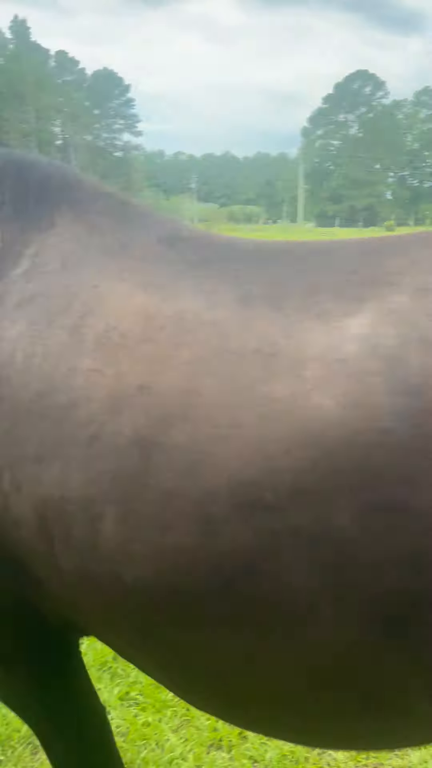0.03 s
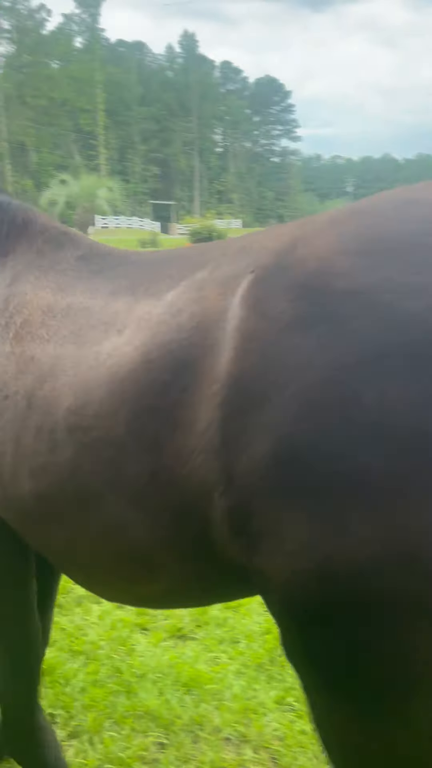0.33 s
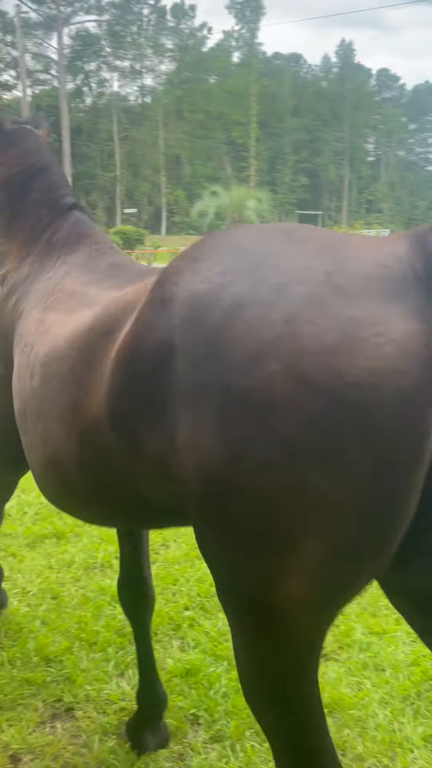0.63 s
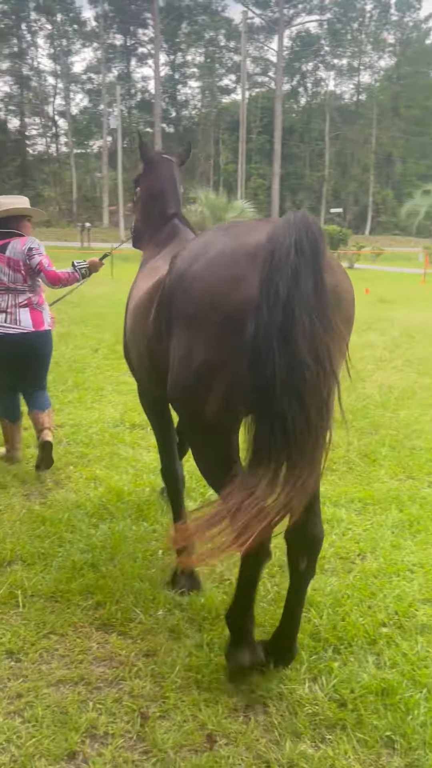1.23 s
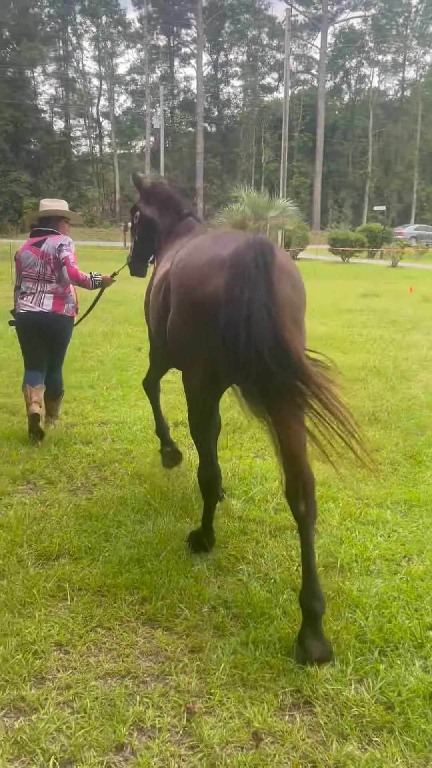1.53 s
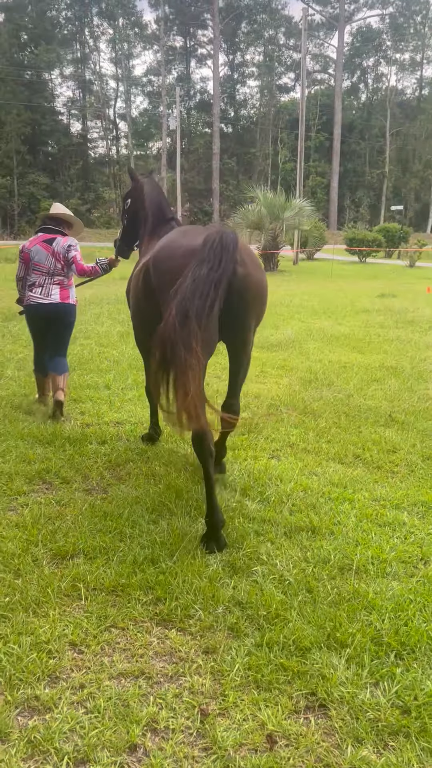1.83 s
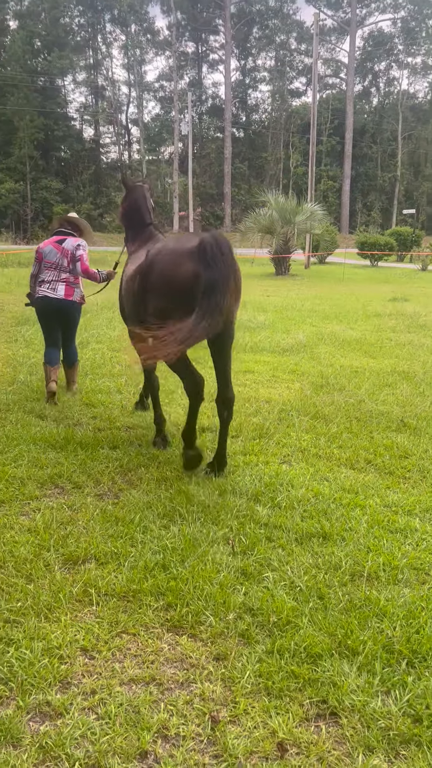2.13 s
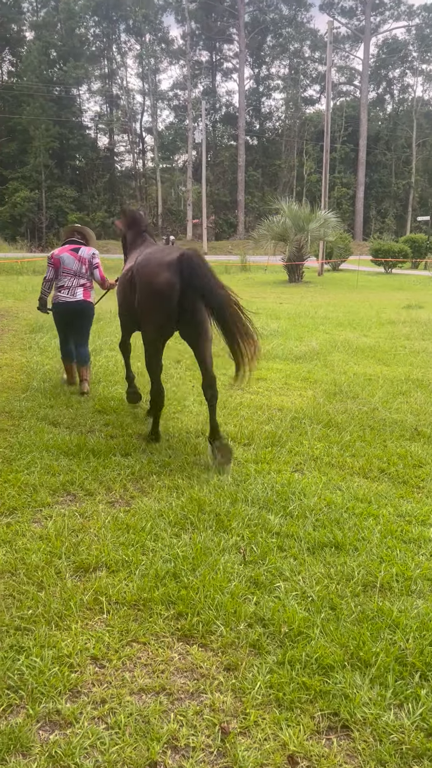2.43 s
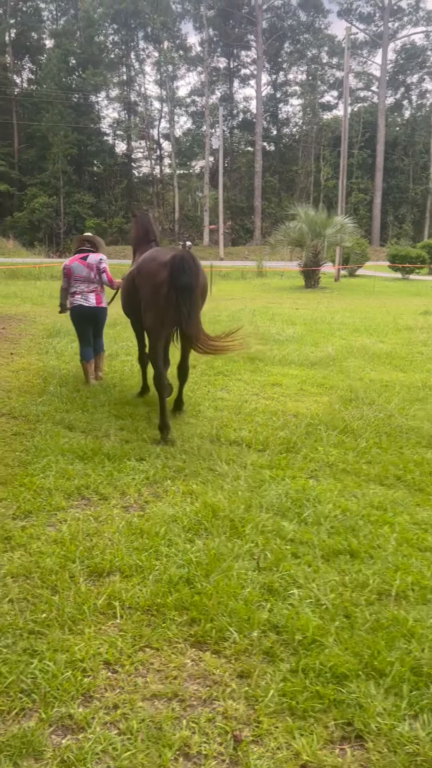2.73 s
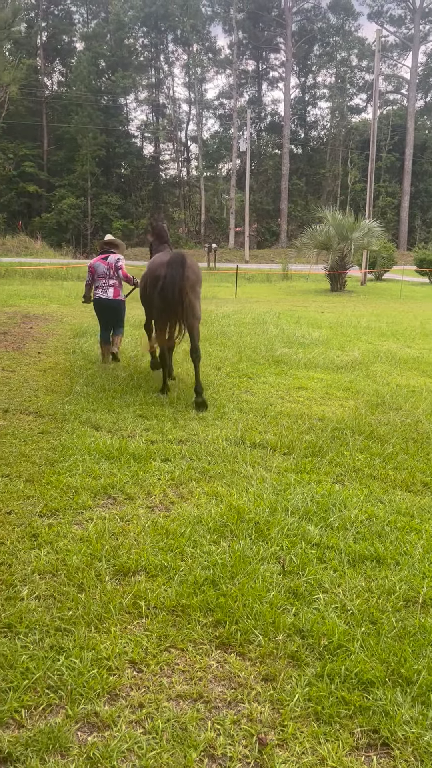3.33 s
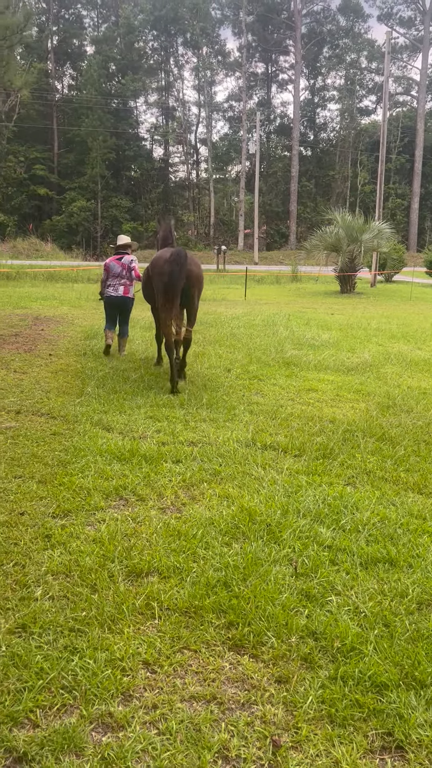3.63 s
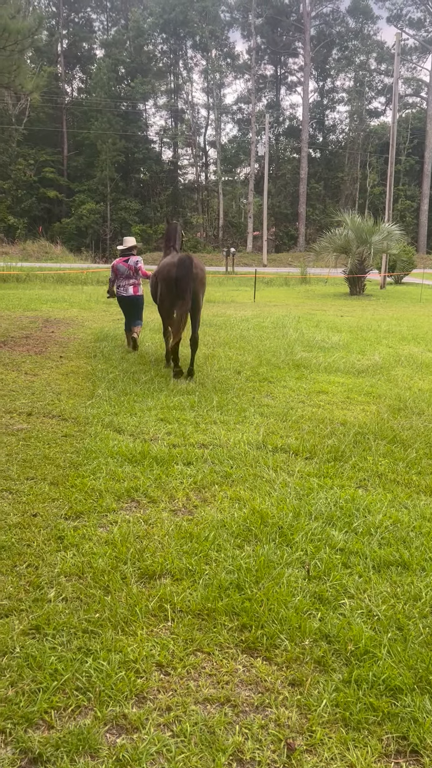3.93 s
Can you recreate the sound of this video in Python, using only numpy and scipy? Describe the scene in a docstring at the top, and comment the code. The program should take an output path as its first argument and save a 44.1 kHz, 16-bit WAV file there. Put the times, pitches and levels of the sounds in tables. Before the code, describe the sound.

A horse and its handler walk away through grass, with soft swishes and dull low thuds, strongest in the first two seconds. Dry stalks snap near 0.1, 0.3 and 0.6 seconds. A distant car rumbles throughout, its tyre hiss swelling around 1.6 seconds, then fading. At about 2.7 seconds a hoof clips something hard with a dry clack. The steps grow faint while far insects shrill steadily on the left.

```python
"""A car rumbles by on the road beyond the field and fades; far insects shrill steadily to the left.
Nearer the stereo pair, a horse and its handler walk away over a lawn: legs swish through the grass,
hooves, steps and wind buffets give dull low thuds, a few dry stalks snap, and sod and thatch
crunch underfoot. Late in the walk a hoof clips something hard."""
import sys
import numpy as np
from scipy import signal
from scipy.fft import rfft, irfft, next_fast_len
from scipy.io import wavfile
from scipy.ndimage import uniform_filter1d, map_coordinates

SR = 44100
rng = np.random.default_rng(int(sys.argv[2]) if len(sys.argv) > 2 else 0)


def waveform_to_disk(signal):
    """Save audio, clipped to [-1, 1], as 16-bit WAV at the path in sys.argv[1]."""
    frames = np.transpose(np.atleast_2d(signal))
    scaled = np.clip(frames, -1, 1) * 32767
    samples = np.round(scaled).astype(np.int16)
    wavfile.write(sys.argv[1], SR, samples)


N = 176400

# the car beyond the field, part by part [t/s, level/dB]
RUMBLE_LEVEL = [(0, -40.5), (.5, -40.5), (1.3, -40.5), (2, -42), (3, -45), (4, -45.5)]
DRONE_LEVEL = [(0, -60), (.35, -44), (1.3, -49.5), (2.2, -57), (3, -60), (4, -82)]
TYRE_LEVEL = [(0, -44.5), (.5, -44), (1.2, -47), (1.75, -47), (2.4, -49.5), (3.2, -50), (4, -51.5)]
HISS_LEVEL = [(0, -60), (1.4, -68), (1.6, -51), (2.1, -52.5), (2.6, -53), (3.2, -55.5), (4, -57)]  # brighter tyre hiss swells as the car goes by
# narrow bands of tyre noise that sink as it passes [t/s, f/Hz, level/dB]
TYRE_WHOOSH = [(0, 1170, -49), (.35, 1017, -50), (.8, 900, -55.5), (1.3, 776.7, -51.5), (1.7, 732.3, -61),
               (4, 729, -67)]
TYRE_WHINE = [(0, 740.6, -77), (1.3, 739, -54), (2, 721, -62), (3, 718, -62.5), (4, 725, -65.5)]
# spectra of the distant sounds [f/Hz, relative level/dB]
RUMBLE_SPECTRUM = [(20, -67), (36, -15.5), (50, -0.5), (75, 2), (110, 1), (160, -4), (220, -11.5),
                   (300, -25.5), (500, -51), (1000, -71)]
DRONE_SPECTRUM = [(80, -19), (150, -2), (220, 3.5), (300, -7.5), (450, -17.5), (800, -37)]
TYRE_SPECTRUM = [(100, -10), (300, -13), (480, -8.5), (650, -7), (730, -0.5), (1150, 1), (1600, -1.5),
                 (2100, -4.5), (2500, -3.5), (2900, -8), (4000, -14), (6000, -18.5), (9000, -52),
                 (16000, -66)]
HISS_SPECTRUM = [(900, -35), (1400, 1), (1650, 3), (2100, 2), (2400, -8), (2900, -19), (4000, -38)]
INSECT_SPECTRUM = [(4000, -63), (6300, -27.5), (6850, -7.5), (7100, -4.5), (7400, -10), (7700, -11.5),
                   (8300, -17), (10000, -44), (16000, -68)]
# how they meet the microphones [f/Hz, coherence, left lead/rad, left over right/dB]
LOW_IMAGE = [(58.6, 0.99, 0, -1), (133, 1, 0, 1), (229, .97, 0, -3.5), (403, 0.68, 0.23, -0.5)]
ROAD_IMAGE = [(288, 0.76, .1, -6), (533, 0.99, 0.77, 4.5), (720, 0.81, 0.17, -0.5), (1110, 0.67, 0.82, 2.5),
              (1430, 0.43, 0.59, -0.5), (2160, 0.74, 1.88, -2), (3080, 0.92, 3.75, 2),
              (3950, 0.08, 3.73, 4.5), (6000, 0.52, 6.7, 3)]
HISS_IMAGE = [(1370, 0.85, 1, 2), (1730, 1, 1, -3), (2310, 1, 0.5, -9), (2790, 0.56, 4.5, -4)]
INSECT_IMAGE = [(6770, .1, 0.69, 11), (6800, 0.11, 1.5, 8.5), (8200, 0.25, 0.79, 1.4)]

SWISHES = [(.2, -44.5, 0.046, 0.04), (.29, -44, 0.058, 0.061), (0.449, -37.5, 0.046, 0.012),
           (.54, -51, 0.014, 0.11), (.63, -46.5, 0.096, 0.052), (.75, -43.5, .03, 0.054),
           (.83, -58, 0.035, 0.02), (.985, -47.5, 0.12, 0.014), (1.12, -51.5, 0.19, 0.076),
           (1.21, -45, 0.051, 0.033), (1.29, -48, 0.043, .06), (1.485, -46.5, 0.074, 0.02),
           (1.62, -50.5, 0.17, .05), (1.74, -43, 0.058, 0.035), (1.8, -48, 0.022, 0.065),
           (1.95, -52.5, 0.038, 0.043), (2.115, -47, 0.039, 0.085), (2.33, -50.5, 0.052, 0.087),
           (2.556, -43, 0.047, 0.037), (2.76, -51, 0.049, 0.044), (2.95, -50.5, 0.042, 0.077),
           (3.43, -55.5, 0.045, .06), (3.56, -57.5, 0.15, 0.033), (3.74, -56.5, 0.085, 0.02),
           (3.96, -52, 0.034, .03)]  # legs through grass [peak t/s, level/dB, rise/s, fall/s]
# dull low thuds of hooves, the handler's steps and wind buffets [t/s, relative level/dB, mid-glide f/Hz]
LOW_THUDS = [(0.092, -28.5, 68), (0.284, -26, 71), (.438, -32, 160), (.446, -28, 74), (0.492, -24.5, 65),
             (.652, -27, 61.4), (0.736, -28.5, 60), (.982, -25.5, 79.8), (1.007, -29.5, 83),
             (1.111, -33.5, 73.6), (1.36, -31.5, 112), (1.494, -23.5, 82), (1.723, -41, 99),
             (1.935, -29.5, 149.4), (1.943, -38.5, 239), (1.954, -26, 76.5), (2.805, -32.5, 66.4),
             (3.118, -35, 75), (3.169, -35, 79)]
STALK_SNAPS = [(.0961, -13.5, 5940, 16700, 0.00063, 0.0079), (.1745, -37, 8000, 15000, .0003, .012),
               (0.197, -36, 6500, 15000, .0002, .007), (0.208, -35, 6000, 14000, .0002, .006),
               (0.215, -41.5, 2200, 6000, .0003, 0.017), (0.236, -38, 2170, 3740, .0003, 0.02),
               (0.267, -35, 9000, 16000, .0002, .006), (0.2767, -25.5, 1890, 9800, 0.00057, 0.015),
               (0.3392, -31, 4500, 14000, 0.00028, 0.0065), (.4635, -30.5, 5000, 13000, .0002, 0.0066),
               (.5422, -43, 8000, 16000, .0002, .008), (0.6464, -16.5, 5150, 17100, 0.002, 0.014),
               (1.2087, -32, 5000, 15000, .0002, 0.0079), (2.1075, -39, 5970, 15000, .0002, .007),
               (2.584, -34, 9000, 17000, .0002, .0067)]  # dry stalks [t/s, level/dB, low f/Hz, high f/Hz, rise/s, t60/s]
STALK_MODES = [(5300, -15), (6550, -22), (9250, -16)]  # a hollow stalk's ring [f/Hz, relative level/dB]
SOD_SCUFFS = [(.44, -52), (0.814, -50.5), (1.214, -51), (1.37, -55), (1.94, -59), (2.549, -47.5),
              (2.754, -53), (2.925, -54), (3.08, -62), (3.25, -58), (3.402, -54), (3.975, -56)]  # feet on sod [t/s, relative level/dB]
THATCH_CRUNCHES = [(0.447, -53, 0.018), (0.987, -43, 0.0091), (1.483, -49.5, 0.016), (2.553, -56, 0.011)]  # feet on dry thatch [peak t/s, level/dB, Gaussian width/s]
KNOCK_MODES = [(199.2, -12, 0.029), (780, -14, 0.033), (1140, -3, 0.012), (1850, 0, 0.0073),
               (2130, 0, 0.0085), (2630, -15.5, .01)]  # the hard thing a hoof clips [f/Hz, relative level/dB, t60/s]
# spectra of the near sounds [f/Hz, relative level/dB]
GRASS_SPECTRUM = [(150, -19), (400, 3.5), (1500, -3.5), (3000, -1), (5500, -4.5), (8000, 0.5), (10000, 2.5),
                  (12000, 4.5), (14000, -0.5), (15600, -4)]
PUFF_SPECTRUM = [(40, -18), (150, 5.5), (300, -6.5), (600, -20), (2000, -45), (8000, -80)]
SOD_SPECTRUM = [(100, -23), (280, 10), (500, 1), (800, -9.5), (1500, -4), (3000, -6), (8000, -53)]
THATCH_SPECTRUM = [(600, -8), (1500, -2), (2300, 8), (3500, -13), (6000, -12), (12000, -9)]
LAWN_COHERENCE = [(300, .85), (2000, .5), (5000, .4), (8000, .75), (10000, .96), (15000, .96)]  # how alike the microphones hear the lawn [f/Hz, coherence]
TOP_LIFT = [(13500, 0), (14600, 3), (15700, 5)]  # a gentle brightening of the highest treble [f/Hz, gain/dB]


def amp(db):
    return 10 ** (np.asarray(db) / 20)


def unit(x):
    return x / np.sqrt(np.mean(x ** 2) + 1e-20)


def along(points, hz):
    """Each column after the frequency, read on a log axis."""
    f, *cols = np.transpose(points)
    return [np.interp(np.log(hz + 1), np.log(f + 1), c) for c in cols]


def curves(rows):
    """One value per sample for each column after the time."""
    s, *cols = np.transpose(rows)
    return [np.interp(np.arange(N) / SR, s, c) for c in cols]


def wobble(per_s):
    """A smooth random curve with per_s knots a second."""
    knots = rng.standard_normal(int(N * per_s / SR) + 4)
    return map_coordinates(knots, [np.arange(N) * per_s / SR])


def impulses(per_s):
    """Two channels of randomly timed unit clicks."""
    return rng.random((2, N)) < per_s / SR


def filtered(x, response):
    """x through a frequency response."""
    m = next_fast_len(N + SR // 4)
    return irfft(rfft(x, m) * response(np.fft.rfftfreq(m, 1 / SR)), m)[..., :N]


def add(track, s, sound):
    """Mix a sound in at time s."""
    part = track[..., max(round(s * SR), 0):][..., :sound.shape[-1]]
    part += sound[..., :part.shape[-1]]


def coloured(x, spectrum):
    """x shaped by the spectrum, at rms 1."""
    return unit(filtered(x, lambda hz: amp(along(spectrum, hz)[0])))


def placed(pair, image):
    """Mid and side become left and right; image(hz) gives coherence, phase lead and balance."""
    m = next_fast_len(N + SR // 4)
    coherence, lead, balance_db = image(np.fft.rfftfreq(m, 1 / SR))
    turn = np.arccos(np.clip(coherence, 0, 1)) / 2
    mid, side = rfft(pair, m) * [np.cos(turn), np.sin(turn)]
    tilt = amp(balance_db / 2) * np.exp(.5j * lead)
    norm = np.sqrt((amp(balance_db) + amp(-balance_db)) / 2)
    return irfft(np.array([(mid + side) * tilt, (mid - side) / tilt]) / norm, m)[:, :N]


def rush(spectrum, image, patchy_db):
    """Stereo noise with patches of random gain across time and frequency."""
    cells = signal.stft(rng.standard_normal((2, N)), nperseg=512)[2]
    patches = uniform_filter1d(rng.standard_normal(cells.shape[1:]), size=4, axis=0)
    patches = uniform_filter1d(patches, size=12, axis=1)
    pair = signal.istft(cells * amp(patchy_db * unit(patches)), nperseg=512)[1][:, :N]
    return placed(coloured(pair, spectrum), lambda hz: along(image, hz))


def gliding_band(rows, half_width_hz):
    """Two channels of narrow noise following [t/s, f/Hz, level/dB] rows."""
    centre_hz, db = curves(rows)
    i, q = filtered(rng.standard_normal((2, 2, N)), lambda hz: 1 / (1 + (hz / half_width_hz) ** 2))
    phase = 2 * np.pi * np.cumsum(centre_hz) / SR
    return amp(db) * unit(i * np.cos(phase) + q * np.sin(phase))


def from_lawn(hz, lag_s=.000278, in_phase_hz=12050):
    """Treble from the lawn reaches the left microphone a little late."""
    lead = -2 * np.pi * lag_s * (hz - in_phase_hz) * (hz > 7000)
    return along(LAWN_COHERENCE, hz)[0], lead, np.zeros_like(hz)


def passing_car():
    """Beyond the field, rumble, drone and tyre noise fade as the car draws away."""
    rumble = amp(curves(RUMBLE_LEVEL)[0]) * rush(RUMBLE_SPECTRUM, LOW_IMAGE, patchy_db=-1.38)
    drone = amp(curves(DRONE_LEVEL)[0]) * rush(DRONE_SPECTRUM, LOW_IMAGE, patchy_db=-0.05)
    tyre_db = curves(TYRE_LEVEL)[0] + 0.98 * wobble(per_s=24.83)
    tyres = amp(tyre_db) * rush(TYRE_SPECTRUM, ROAD_IMAGE, patchy_db=1.38)
    hiss = amp(curves(HISS_LEVEL)[0]) * rush(HISS_SPECTRUM, HISS_IMAGE, patchy_db=1.5)
    whoosh = gliding_band(TYRE_WHOOSH, half_width_hz=167)
    whine = gliding_band(TYRE_WHINE, half_width_hz=23)
    return rumble + drone + tyres + hiss + placed(whoosh + whine, lambda hz: along(ROAD_IMAGE, hz))


def insects(level_db=-53, fade_db_per_s=0.1):
    """Far off to the left, a chorus merges into one narrow, trembling band."""
    db = level_db - fade_db_per_s * np.arange(N) / SR + 0.75 * wobble(per_s=50)
    return amp(db) * rush(INSECT_SPECTRUM, INSECT_IMAGE, patchy_db=0.3)


def grass_swishes(rustle_db=-55, fade_db_per_s=2.5, blade_share=0.47, scatter_db=4):
    """Blades brush against the legs; each stroke swells out of a fading rustle and dies away."""
    t = np.arange(N) / SR
    power = amp(rustle_db - fade_db_per_s * t) ** 2
    for s, db, rise, fall in SWISHES:
        stroke = amp(db) * np.exp(-np.maximum((s - t) / rise, (t - s) / fall))
        power += stroke ** 2
    blades = impulses(per_s=1800) * rng.choice([-1, 1], (2, N))
    blades = blades * amp(scatter_db * np.clip(rng.standard_normal((2, N)), -2, 2))
    brush = np.sqrt(blade_share) * unit(blades) + np.sqrt(1 - blade_share) * rng.standard_normal((2, N))
    ticks = impulses(per_s=90) * np.tanh(rng.standard_normal((2, N)))  # stiff blades spring back
    rustle = coloured(brush + amp(-7) * unit(ticks), GRASS_SPECTRUM)
    flicker = amp(1.18 * wobble(per_s=110))
    return placed(rustle * np.sqrt(power) * flicker, from_lawn)


def low_thuds(rise_s=0.0076, push_t60_s=0.074, puff_t60_s=0.033, sag=0.43, sag_s=0.022):
    """Dead centre, a hoof, step or wind buffet gives one low push, sagging in pitch, and a dull puff."""
    out, t = np.zeros(N), np.arange(SR // 5) / SR
    noise = coloured(rng.standard_normal(N), PUFF_SPECTRUM)
    glide = 1 + sag * (2 * np.exp(-t / sag_s) - 1)
    for s, db, hz in LOW_THUDS:
        phase = 2 * np.pi * np.cumsum(hz * glide) / SR
        push = 2 * np.sin(phase) * amp(-60 * t / push_t60_s)
        puff = noise[round(s * SR / 2):][:len(t)] * amp(-1 - 60 * t / puff_t60_s)
        add(out, s, amp(db) * (1 - np.exp(-t / rise_s)) * (push + puff))
    return out


def stalk_snaps():
    """A stalk tears fibre by fibre in a few milliseconds, and its tube rings briefly."""
    out, t = np.zeros((2, N)), np.arange(SR // 20) / SR
    for s, db, low_hz, high_hz, rise, t60 in STALK_SNAPS:
        band = signal.butter(2, [low_hz, high_hz], "band", fs=SR, output="sos")
        tear = rng.standard_normal((2, len(t)))
        for hz, ring_db in STALK_MODES:
            tear[0] += amp(ring_db) * np.sin(2 * np.pi * (hz * t + rng.random()))
        envelope = amp(db - 60 * t / t60) * (1 - np.exp(-t / rise))
        add(out, s, unit(signal.sosfilt(band, tear)) * envelope)
    return placed(out, from_lawn)


def sod_scuffs(rise_s=0.0018, t60_s=0.11):
    """A foot presses into the sod with a short, dull crunch."""
    swell, t = np.zeros(N), np.arange(SR // 5) / SR
    for s, db in SOD_SCUFFS:
        add(swell, s, 2 * amp(db - 60 * t / t60_s) * (1 - np.exp(-t / rise_s)))
    return swell * coloured(rng.standard_normal(N), SOD_SPECTRUM)


def thatch_crackle():
    """Dead stems crackle as the weight comes down."""
    t = np.arange(N) / SR
    press = sum(amp(db) * np.exp(-.5 * ((t - s) / width) ** 2) for s, db, width in THATCH_CRUNCHES)
    cracks = impulses(per_s=960) * rng.standard_normal((2, N))
    return placed(press * coloured(cracks, THATCH_SPECTRUM), from_lawn)


def hoof_knock(at_s=2.7105, level_db=-22.5):
    """Just right of centre a hoof clips something hard: a dry clack whose hollow tail drops in pitch."""
    ring_rise_s, crack_t60_s = .0003, 0.029
    start_hz, end_hz, glide_s, tail_rise_s, tail_t60_s = 895, 215, 0.0042, 0.0061, 0.04
    out, t = np.zeros((2, N)), np.arange(SR // 10) / SR
    ring = sum(amp(db - 60 * t / t60) * np.sin(2 * np.pi * hz * t) for hz, db, t60 in KNOCK_MODES)
    ring *= 1 - np.exp(-t / ring_rise_s)
    tail_hz = end_hz + (start_hz - end_hz) * np.exp(-t / glide_s)
    tail = np.sin(2 * np.pi * np.cumsum(tail_hz) / SR)
    tail *= amp(-2.5 - 60 * t / tail_t60_s) * (1 - np.exp(-t / tail_rise_s))
    crack = amp(-9.5 - 60 * t / crack_t60_s) * rng.standard_normal((2, len(t)))
    add(out, at_s, signal.lfilter(*signal.butter(2, 6000, fs=SR), crack))
    add(out[0], at_s, ring + tail)  # mid channel only
    return placed(amp(level_db) * out, lambda hz: along([(300, 1.0, .2, -2), (3000, 0.8, 1.3, -1.5)], hz))


def scene():
    """The walk across the lawn, with road and insects in the distance."""
    distance = passing_car() + insects()
    lawn = grass_swishes() + low_thuds() + stalk_snaps() + sod_scuffs() + thatch_crackle() + hoof_knock()
    return distance + lawn


def record(dry):
    """The highest treble is brightened; the deepest bass and all above the band limit are dropped."""
    low_cut_hz, top_hz = 37, 16000

    def response(hz):
        low_cut = 1 / np.sqrt(1 + (low_cut_hz / (hz + 1)) ** 8)
        band_limit = 1 / (1 + (hz / top_hz) ** 400)
        return amp(along(TOP_LIFT, hz)[0]) * low_cut * band_limit

    return filtered(dry, response)


dry = scene()
out = record(dry)
waveform_to_disk(out)
```